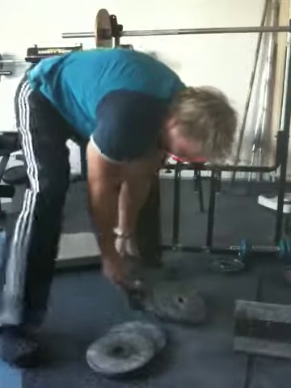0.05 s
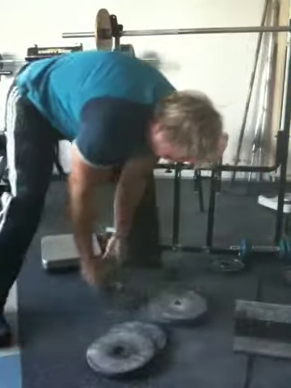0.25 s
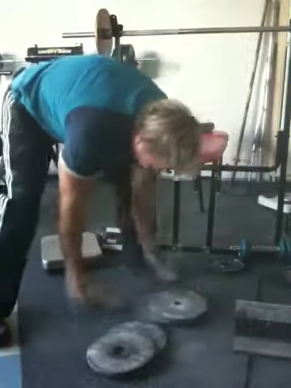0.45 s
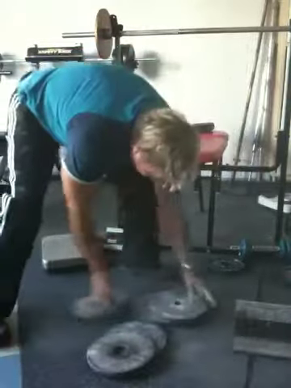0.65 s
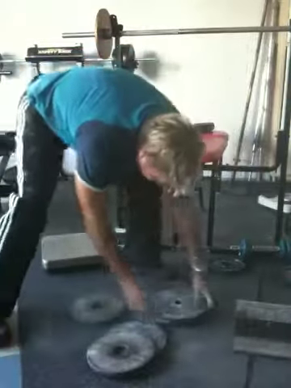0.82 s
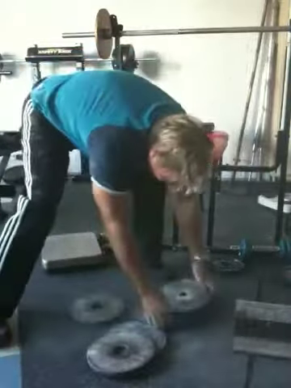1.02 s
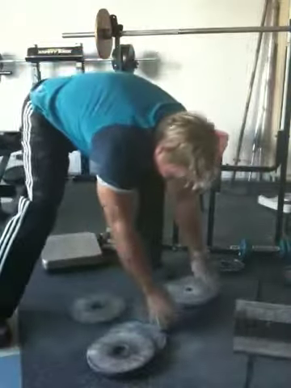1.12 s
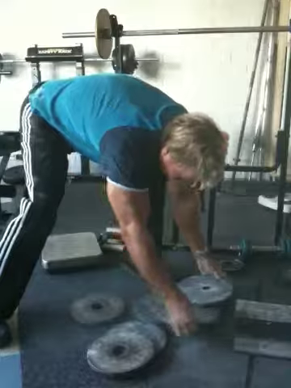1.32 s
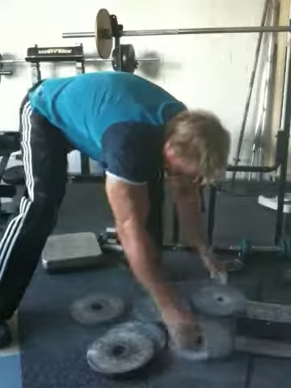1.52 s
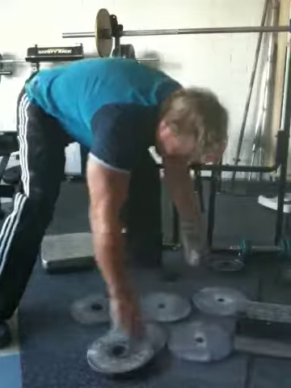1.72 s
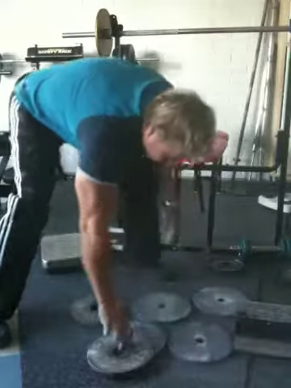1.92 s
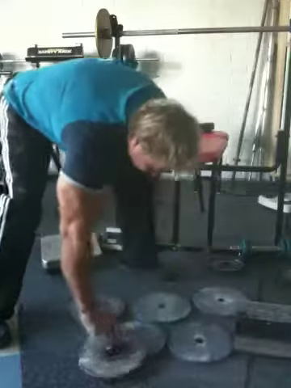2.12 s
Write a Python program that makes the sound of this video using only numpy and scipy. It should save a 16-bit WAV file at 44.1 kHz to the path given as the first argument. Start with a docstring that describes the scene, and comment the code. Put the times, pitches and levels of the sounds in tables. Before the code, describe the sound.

In a small, echoing gym, loose metal weight plates drop with heavy thuds and ringing clanks. After a sharp snap and softer bumps, a plate is dragged across another, rubbing and squealing, then lands and settles.

```python
"""Loose iron weight plates are spread out by hand on the rubber floor of a small, live gym.
They clank against each other and ring in their bending modes; as they drop and rock, their thuds
set floor and room booming, and one rim snaps down. One plate is dragged off another, rubbing and
squealing, its ring sinking as it slides free. The heaviest drop overloads the microphone.
Quiet room tone lies underneath."""
import sys
import numpy as np
from scipy import signal
from scipy.io import wavfile
from scipy.ndimage import uniform_filter1d

SR = 44100
rng = np.random.default_rng(int(sys.argv[2]) if len(sys.argv) > 2 else 0)


def output_pcm(signal):
    """Save a mono or channel-first signal as 16-bit PCM at the path in sys.argv[1].

    Samples are clipped to [-1, 1] before scaling.
    """
    pcm = np.clip(np.atleast_2d(signal).T, -1, 1) * 32767
    wavfile.write(sys.argv[1], SR, np.round(pcm).astype(np.int16))


N = 94815


def clanks(rise_s=0.00075, hard_db=-31, wobble_hz=4.9, wobble_depth=.55, direct_db=-12.5, wet_db=-8):
    """Impact excitation: iron strikes iron with a broadband clack, and the plate's modes ring on."""
    # (time [s], plate [rounded: 0 A, 1 B, 2 C, 3 or -1 A pinned], clack level [dB], ring level [dB])
    strikes = [(0.069, 1, -45, -54), (0.0946, 3, -31.5, -32.5), (.099, -0.5, -35.5, -32.5),
               (0.204, 3, -34.5, -38), (0.232, -1, -28.5, -41), (.256, 1, -46, -34),
               (.292, 0, -34.5, -27.5), (.315, 0, -35.5, -24.5), (.342, 0, -34, -34.5),
               (1.389, 3, -48.5, -41), (1.518, 2, -52, -47.5), (1.585, 2, -37.5, -40), (1.594, 2, -39, -37),
               (1.611, 2, -40, -37.5)]
    # modes of the three plates (frequency [Hz], level [dB], t60 [s])
    plate_a = [(1518, -4, .27), (2490, -.5, .21), (3535, -11, .33), (5580, -15, .35), (6100, -17.5, .31),
               (8920, -14.5, .26), (9220, -18, .26), (10310, -21, .28), (12180, -30, .33), (13440, -32, .4),
               (14320, -32, .3)]
    plate_b = [(1653, 0, .74), (2670, -8.5, .98), (5749, -16, .7), (9570, -30, .8)]
    plate_c = [(1421, -6, .45), (1535, 0, .28), (2320, -1, .34), (3327, -5.5, .4), (4770, -10, .35),
               (5010, -15, .36), (5680, -13, .31), (8511, -11, .27), (9566, -25, .6)]
    # pinned by another plate, A rings higher and shorter (frequency [Hz], level [dB], t60 [s])
    plate_a_pinned = [(1894, 3, .07), (2615, -4, 0.13), (3950, -13, 0.072)]
    # spectrum of a hard clack (frequency [Hz], level [dB])
    clack_spectrum = [(30, -34.5), (120, -10), (400, 0.5), (1900, -2), (3000, -7.5), (4500, -17.5),
                      (7000, -21), (9500, -27), (12000, -47)]
    plates = (plate_a, plate_b, plate_c, plate_a_pinned)
    out, t = np.zeros(N), np.arange(SR) / SR
    rise = 1 - np.exp(-t / rise_s)
    wobble = 1 - wobble_depth * np.cos(2 * np.pi * wobble_hz * t)
    for s, plate, clack_db, ring_db in strikes:
        # a softer blow stays longer in contact and so loses treble
        tilt = 0.7 * min(clack_db - hard_db, 0)  # dB per octave
        modes = [(hz, db + tilt * max(np.log2(hz / 2500), 0), t60)
                 for hz, db, t60 in plates[round(plate)]]
        if round(plate) == 1:  # B wobbles freely: its ring swells, dips and outlasts the room
            tone = rise * wobble * ring(modes)
        else:
            tone = rise * ring(modes, chatter=1.1)
            reflected = packet(signal.fftconvolve(tone, room(direct_db))[:SR])
            tone = tone + amp(wet_db) * reflected
        spectrum = [(hz, db + tilt * max(np.log2(hz / 2000), 0)) for hz, db in clack_spectrum]
        clack = rise * colour(room(direct_db), spectrum)
        add(out, s, at_level(tone, ring_db) + at_level(clack, clack_db))
    return out


def thuds(swell_s=0.0069, boom_db=-4.5):
    """Resonance: each landing is a dull push that excites the low modes of floor and room."""
    # a plate lands, rocks or bumps (time [s], level [dB], tilt [dB/octave])
    landings = [(.221, -9.5, 2.5), (.236, -14, 4), (0.26, -17.5, 6), (.287, -15.5, 7.5), (.317, -27.5, 4.5),
                (.844, -26.5, -6.5), (.884, -28, -4.5), (.924, -32, -4), (.947, -30.5, -2),
                (.972, -39.5, -2), (1.481, -31.5, -14), (1.528, -29, -12.5), (1.594, -18, 1.5),
                (1.637, -29, 2), (1.725, -34, 0), (1.801, -36.5, -2.5), (1.861, -39.5, -2.5)]
    # spectrum of the push (frequency [Hz], level [dB])
    push_spectrum = [(35, -55), (75, -33.5), (145, -8.5), (215, -6), (310, 1), (430, -5), (600, -16.5),
                     (1000, -31), (2000, -48), (8000, -73.5)]
    # modes of floor and room (frequency [Hz], level [dB], t60 [s])
    boom_modes = [(146, -3, .65), (180, -7, .7), (272, -7, .6), (298, -3, .9), (343, 0, .45), (388, -1, .5),
                  (437, -1, .42), (506, -8, .42), (566, -10, .4)]
    out, t = np.zeros(N), np.arange(SR) / SR
    swell = 1 - np.exp(-(t / swell_s) ** 2)
    for s, db, tilt in landings:
        push = packet(colour(room(direct_db=-6), push_spectrum, tilt))
        boom = ring([(hz, level + tilt * np.log2(hz), t60) for hz, level, t60 in boom_modes])
        add(out, s, at_level(push + amp(boom_db) * swell * boom, db))
    return out


def rim_snap(time_s=.8438, peak_db=-18.5):
    """Impulsive contact: a rim touching down gives one short, broadband snap."""
    # spectrum of the snap (frequency [Hz], level [dB])
    snap_spectrum = [(40, -61), (200, -32), (900, -6.5), (1600, 5), (2600, -2), (4000, -20), (10000, -64)]
    out = np.zeros(N)
    snap = colour(room(direct_db=2.5), snap_spectrum)
    add(out, time_s, amp(peak_db) * snap / abs(snap).max())
    return out


def scrape(free_hz=1522.7, jitter_hz=100, narrow_hz=18, wide_hz=110):
    """Forced vibration: grit drives a sliding plate, whose modes contact stiffens and damps."""
    # course of the slide (time [s], rub level [dB], ring level [dB])
    slide = [(0, -47.5, -53), (.2, -41.5, -46), (.26, -53, -44), (.8, -64, -81), (.807, -51, -79),
             (.93, -39, -65.5), (1, -50, -55), (1.12, -46, -45), (1.15, -52, -53.5), (1.21, -44, -47.5),
             (1.315, -42.5, -37), (1.38, -41, -38), (1.42, -34, -39), (1.48, -39, -41.5), (1.66, -37, -40),
             (1.74, -52, -55), (2.1, -67.5, -100)]
    # effect of contact pressure (time [s], nominal lowest mode [Hz], nominal bandwidth [Hz])
    contact = [(0, 1540, 73), (.98, 1780, 66), (1.12, 1699, 40), (1.17, 1745, 90), (1.24, 1826, 68),
               (1.34, 1977, 58), (1.39, 1900, 95), (1.44, 1650, 59), (1.49, 1514, 12)]
    # modes of the sliding plate (free frequency [Hz], level [dB], share of the stiffening [ratio])
    slide_modes = [(1524, 1, 0.95), (2442, -4.5, 0.28), (3494, -11, 0.58), (5580, -25.5, 0.076),
                   (5980, -24.5, 0.32), (8930, -31, .1), (9270, -31, 0.09)]
    # spectrum of the rub (frequency [Hz], level [dB])
    rub_spectrum = [(40, -52.5), (140, 3.5), (350, 0), (750, 6.5), (1250, -5.5), (2000, -11), (3200, -21),
                    (4200, -50), (5500, -51), (12000, -52)]
    rub_db, ring_db = curves(slide)
    lowest_hz, width_hz = curves(contact)
    damping = np.clip((width_hz - narrow_hz) / (wide_hz - narrow_hz), 0, 1)
    drive, tone = grit(), np.zeros(N)
    for hz, db, share in slide_modes:
        jitter = jitter_hz * damping * wander(N, smoothing=250)  # grinding unsteadies the pitch
        track = hz + share * (lowest_hz + jitter - free_hz)
        damped, free = resonate(drive, track, wide_hz), resonate(drive, track, narrow_hz)
        tone += amp(db) * (damping * damped + (1 - damping) * free)
    rub = unit(colour(grit(), rub_spectrum))
    direct = amp(rub_db) * rub + amp(ring_db) * unit(tone)
    return signal.fftconvolve(direct, packet(room(direct_db=6.5)))[:N]


def squeals(rise_s=0.0025, release_t60=0.099, waver=0.00083):
    """Stick-slip friction: a dragged rim sustains one wavering mode, which rings out on release."""
    # (time [s], duration [s], frequency [Hz], level [dB])
    held_modes = [(1.392, 0.086, 2482, -42.5), (1.475, 0.052, 5550, -59.5), (1.508, 0.061, 1514, -39.5),
                  (1.519, 0.054, 2480, -33.5), (1.68, 0.039, 4780, -58)]
    out, t = np.zeros(N), np.arange(SR) / SR
    for s, length, hz, db in held_modes:
        pitch = hz * (1 + waver * wander(SR, smoothing=400))
        tone = unit(np.sin(2 * np.pi * np.cumsum(pitch) / SR))
        rise = 1 - np.exp(-t / rise_s)
        release = np.exp(-np.log(1000) * np.maximum(t - length, 0) / release_t60)
        add(out, s, amp(db) * rise * release * tone)
    return out


def room(direct_db, early_db=4, early_s=0.04):
    """Reverberation: a direct impulse, strong early reflections and a tail that decays band by band."""
    # reverberation time (frequency [Hz], t60 [s])
    decay_times = [(170, 0.95), (450, 0.42), (1000, 0.34), (3000, 0.27), (8000, 0.5), (16000, 0.067)]
    hz, t, bands = signal.stft(rng.choice([-1., 1.], SR), SR, nperseg=256)
    decay = np.exp(-np.log(1000) * t / read(decay_times, hz)[:, None])
    early_boost = amp(early_db * np.exp(-t / early_s))
    response = packet(signal.istft(bands * decay * early_boost, SR)[1][:SR])
    response[0] += amp(direct_db)
    return response


def room_tone(noise_db=-56.5, whine_hz=15690, whine_db=-78):
    """Stationary background: quiet, low noise with a very faint, steady high whine."""
    # spectrum of the noise (frequency [Hz], level [dB])
    noise_spectrum = [(25, -25.5), (130, 0), (320, 6), (700, -6.5), (5000, -28), (15000, -30.5)]
    noise = unit(colour(rng.standard_normal(N), noise_spectrum))
    whine = unit(np.sin(2 * np.pi * whine_hz * np.arange(N) / SR))
    return amp(noise_db) * noise + amp(whine_db) * whine


def ring(modes, chatter=0, chatter_hz=45, settle_s=.12):
    """Modal decay: a sum of damped sines, each smeared while touching plates chatter."""
    out, t = np.zeros(SR), np.arange(SR) / SR
    for hz, db, t60 in modes:
        re, im = rng.standard_normal((2, SR))
        smear_hz = chatter_hz * np.sqrt(hz / 2000)  # higher modes smear more widely
        shake = signal.sosfilt(signal.butter(2, smear_hz, fs=SR, output="sos"), re + 1j * im)
        modulation = 1 + chatter * np.exp(-t / settle_s) * shake / shake.std()
        wave = modulation * np.exp(2j * np.pi * (hz * t + rng.random()))
        out += amp(db) * np.exp(-np.log(1000) * t / t60) * wave.real
    return packet(out)


def grit(grains_per_s=2500, spread_db=3.5):
    """Shot noise: the dense, tiny collisions of a rough surface."""
    size = amp(spread_db * np.minimum(rng.exponential(1, N), 4))
    return size * rng.choice([-1., 1.], N) * (rng.random(N) < grains_per_s / SR)


def resonate(x, hz, width_hz):
    """Time-varying resonance: a steep-skirted passband follows the curve hz."""
    carrier = np.exp(2j * np.pi * np.cumsum(hz) / SR)
    pole = np.exp(-np.pi * width_hz / SR)
    baseband = signal.lfilter([1 - pole], [1, -pole], x / carrier)
    skirt = signal.butter(1, 250, fs=SR)
    return unit((carrier * signal.lfilter(*skirt, baseband)).real)


def colour(x, spectrum, tilt=0, size=4096):
    """Minimum-phase filtering to a spectrum, tilted in dB per octave over the bass and middle."""
    hz = abs(np.fft.fftfreq(size, 1 / SR))
    log_gain = np.log(amp(read(spectrum, hz) + tilt * np.log2(np.clip(hz, 140, 2000))))
    taps = np.fft.ifft(np.exp(np.conj(signal.hilbert(log_gain)))).real
    return signal.fftconvolve(x, taps[:size // 2])[:len(x)]


def wander(n, smoothing):
    """Random drift of rms 1: a moving average of noise over `smoothing` samples."""
    return unit(uniform_filter1d(rng.standard_normal(n), size=smoothing))


def amp(db):
    """Decibels to amplitude ratio."""
    return 10 ** (np.asarray(db) / 20)


def unit(x):
    """Normalisation to rms 1."""
    return x / np.sqrt(np.mean(x ** 2) + 1e-20)


def packet(x):
    """Normalisation to energy 1."""
    return x / np.linalg.norm(x)


def at_level(x, db, onset_s=.04):
    """Normalisation of a blow's onset to an rms level."""
    return x * amp(db) / np.sqrt(np.mean(x[:int(onset_s * SR)] ** 2))


def read(points, hz):
    """Interpolation on a log-frequency axis."""
    f, value = np.transpose(points)
    return np.interp(np.log(hz + 1), np.log(f + 1), value)


def curves(table):
    """Interpolation in time, one curve per column."""
    s, *columns = np.transpose(table)
    return [np.interp(np.arange(N) / SR, s, c) for c in columns]


def add(mix, s, sound):
    """Superposition of a sound on the mix at time s."""
    part = mix[max(round(s * SR), 0):][:len(sound)]
    part += sound[:len(part)]


def scene():
    """Superposition: all sources sum at one microphone."""
    return (thuds() + clanks() + rim_snap() + scrape() + squeals() + room_tone())[None]


def record(dry, ceiling=.71, knee=42, cutoff_hz=15850):
    """Saturation: overload flattens the highest peaks, then a low-pass limits the band."""
    squeezed = dry / (1 + abs(dry / ceiling) ** knee) ** (1 / knee)
    lowpass = signal.firwin(511, cutoff_hz, window=("kaiser", 9), fs=SR)
    return signal.oaconvolve(squeezed, lowpass[None], "same")


dry = scene()
out = record(dry)
output_pcm(out)
```